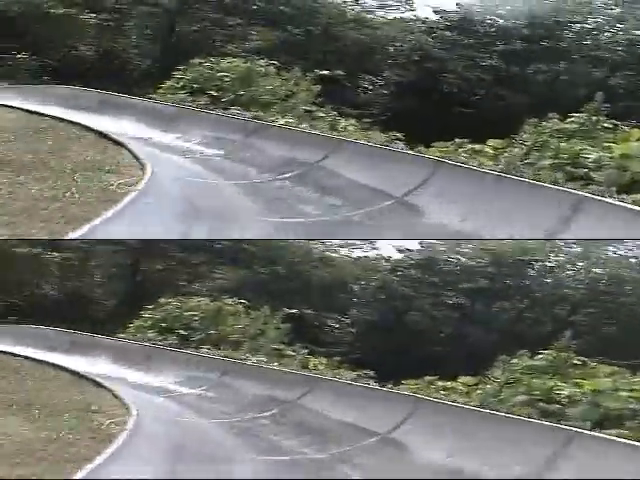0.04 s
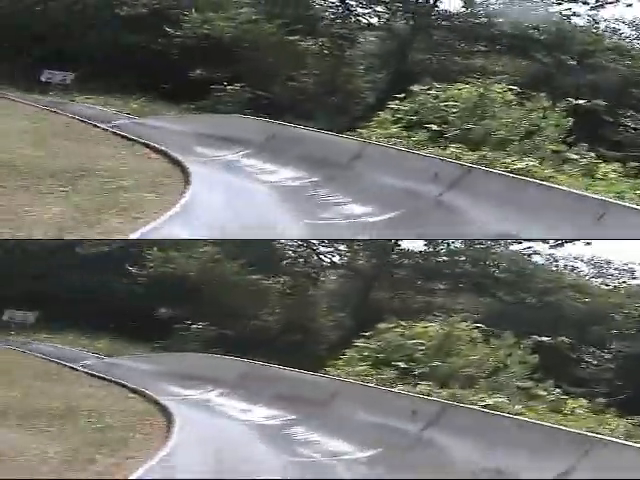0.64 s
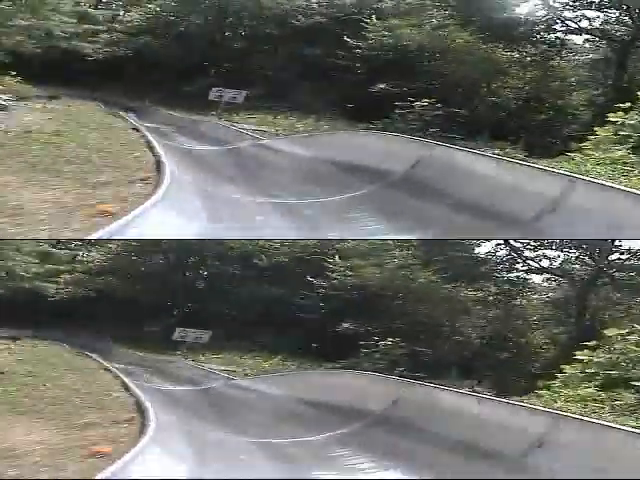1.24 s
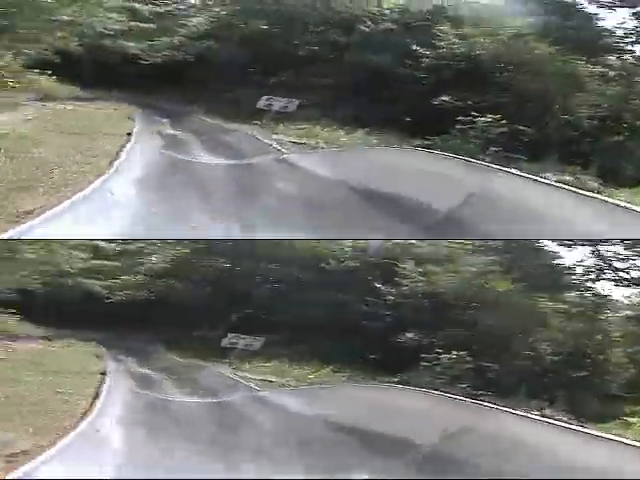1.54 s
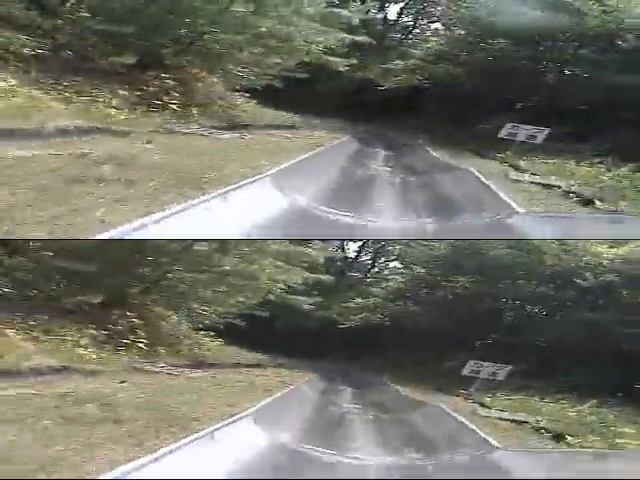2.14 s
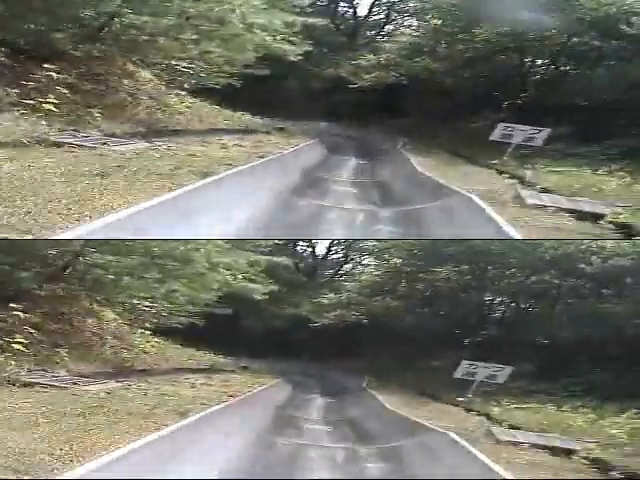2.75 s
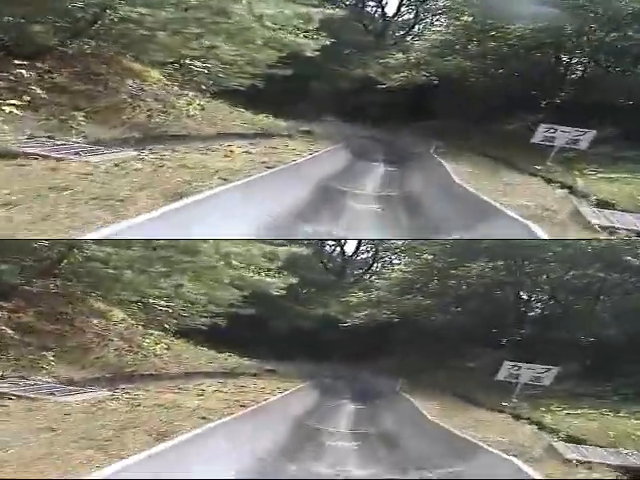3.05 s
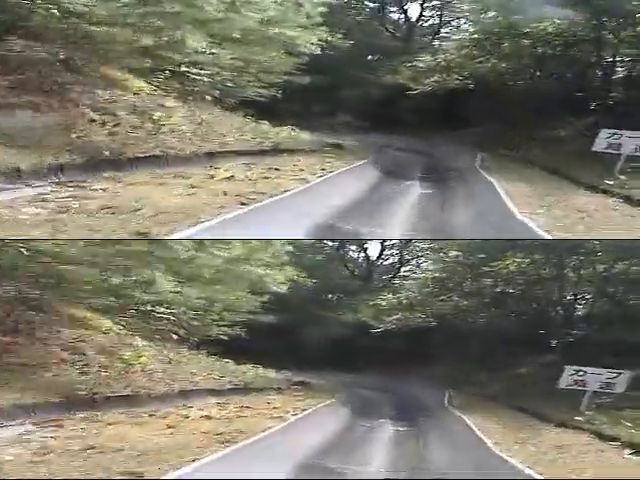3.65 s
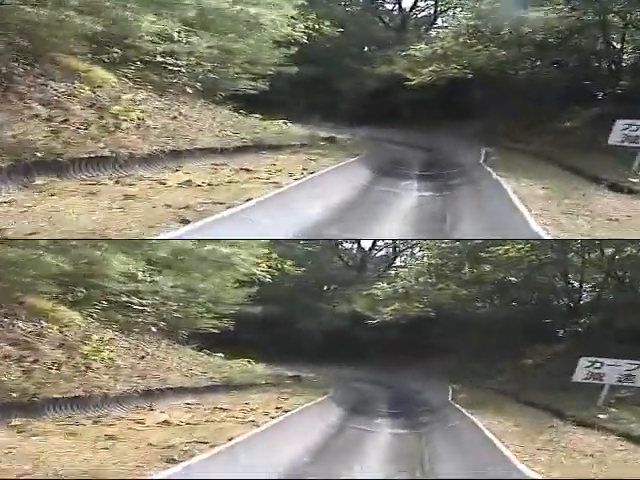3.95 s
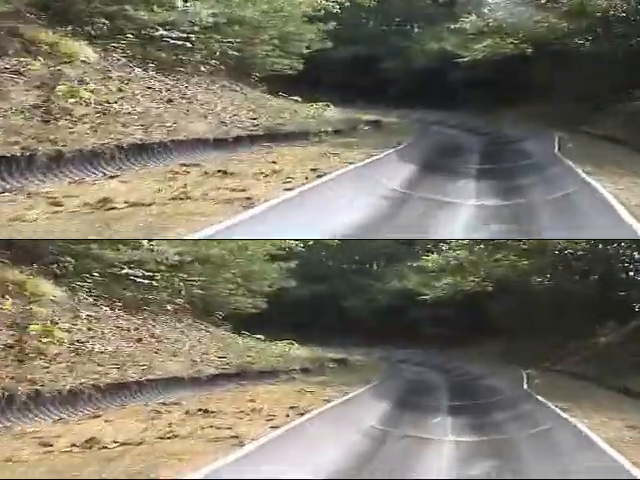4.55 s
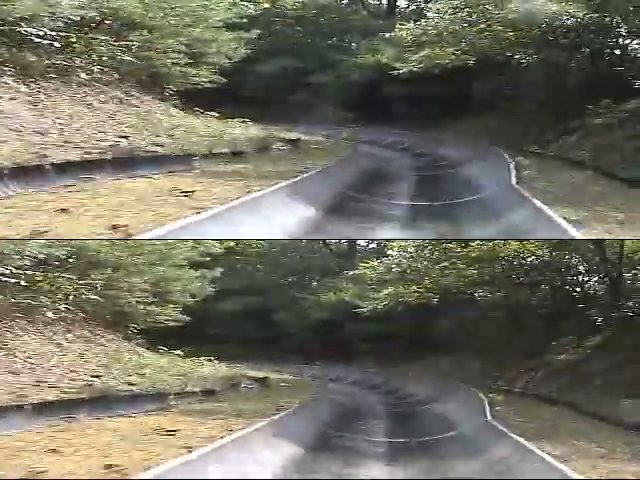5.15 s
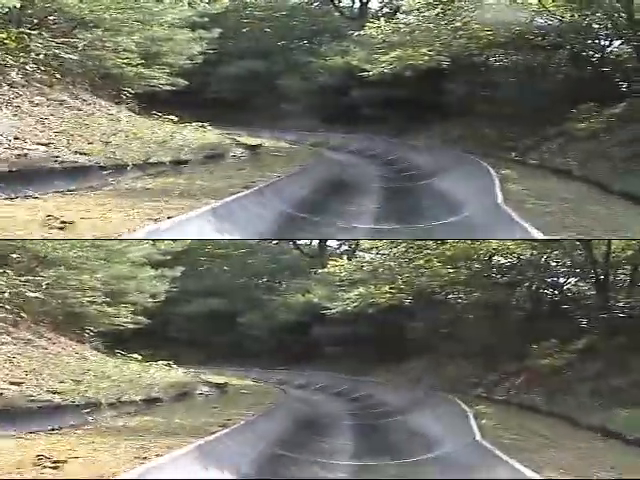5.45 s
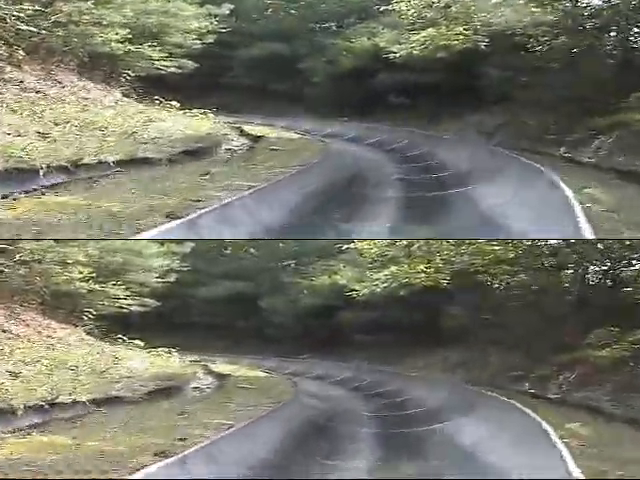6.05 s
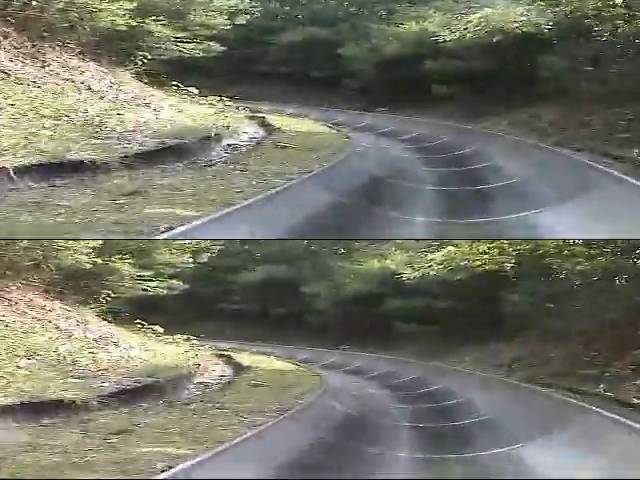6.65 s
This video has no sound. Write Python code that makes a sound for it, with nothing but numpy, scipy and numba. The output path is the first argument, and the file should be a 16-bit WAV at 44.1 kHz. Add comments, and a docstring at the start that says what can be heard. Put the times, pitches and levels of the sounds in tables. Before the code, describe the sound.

A wheeled sled runs down a concrete track, heard from on board. Its wheels rumble and knock over slab joints while the hollow shell booms and loose metal parts clatter. The rolling is gritty at first, then smoother, and the knocks gradually spread out. Cicadas hiss and throb in the surrounding trees, growing louder later on, as gusts of wind buffet the microphone.

```python
"""A wheeled bobsleigh runs down a concrete track towards a wood, heard from a camera on board.
Its wheels rumble and knock over slab joints, the hollow shell booms and loose metal parts clatter.
Behind it, cicadas hiss and throb in the trees with their clicking tymbals, faint whirs glide upward
and wind buffets the microphone. The camera's gain ducks after loud blows."""
import sys
import numpy as np
from scipy import signal
from scipy.fft import rfft, irfft, next_fast_len
from scipy.io import wavfile
from scipy.ndimage import uniform_filter1d
from numba import njit

SR = 44100
rng = np.random.default_rng(int(sys.argv[2]) if len(sys.argv) > 2 else 0)


def master(y):
    """Save y as 16-bit WAV."""
    cut = np.clip(np.atleast_2d(y).T, -1, 1)
    pcm = np.round(cut * 32767)  # scale
    wavfile.write(sys.argv[1], SR, pcm.astype(np.int16))


N = 304731
TIME = np.arange(N) / SR

# wind at the microphone and its gusts
WIND_EQ = [(15, -42), (40, -9), (90, 2), (170, -2.5), (300, -2.5), (600, -19.5), (1500, -32), (5000, -48.5)]  # f/Hz, level/dB
WIND_FADER = [(0, -42), (.25, -58), (.47, -45), (.75, -62), (.98, -48.5), (1.1, -66), (1.55, -59),
              (1.85, -52), (2.3, -53), (2.57, -45), (3.2, -53.5), (3.85, -41.5), (4.25, -51.5), (5, -37.5),
              (5.6, -45.5), (6.1, -46), (6.4, -49), (6.9, -46)]  # t/s, relative level/dB
# the cicada chorus as the trees pass, and the nearest cicada
CHORUS_EQ = [(100, -45), (2000, -15), (3800, -13.5), (5000, 1), (6000, 0.5), (7000, -1), (8400, 1),
             (9200, -5), (10000, -22.5)]  # f/Hz, level/dB
CHORUS_FADER = [(0, -42), (1.5, -45.5), (2.3, -41.5), (2.9, -33.5), (3.02, -40.5), (3.45, -42),
                (3.9, -37.5), (4.45, -41.5), (5.1, -35), (5.75, -34), (6.35, -37.5), (6.9, -35)]  # t/s, relative level/dB
NEAR_CICADA_FADER = [(0, -48), (2, -48), (2.8, -44), (3.4, -46), (3.9, -35), (4.5, -41.5), (4.9, -32),
                     (5.77, -29), (5.85, -34), (6.4, -43), (6.9, -37)]  # t/s, level at the crest of the throb/dB
# faint rising whirs: t/s, level/dB
WHIR_CUES = [(2.718, -47), (3.725, -56), (4.679, -49.5), (5.65, -48), (6.274, -48), (6.555, -54)]
# resonances of the hollow shell and the loose metal parts: f/Hz, width/Hz, lift/dB
SHELL_MODES = [(168, 22, 0), (320, 110, 1), (375.5, 100, 3), (442, 39, 0), (547, 185, 5), (682, 83, 2.5),
               (789, 24, 3), (962, 14, 2), (1236, 60, -1.5), (1477, 24, 2.5), (1900, 48, 3.5)]
METAL_MODES = [(1620, 90, 4), (2100, 110, 4), (2560, 110, 3), (2975, 70, 5), (3444, 140, 5), (4150, 200, 4),
               (4700, 200, 2)]
# tone of the sled's ticks, rumble, grit, clatter and knocks: f/Hz, level/dB
TICK_EQ = [(300, -27), (1500, -9), (2700, -5.5), (3800, 8.5), (5000, -4), (9000, -14.5)]
RUMBLE_EQ = [(30, -30.5), (120, -5.5), (270, 7), (560, 1), (800, -1), (1100, -16.5), (2500, -12),
             (5000, -50.5)]
GRIT_EQ = [(40, -42), (300, -1.5), (800, 15), (1500, 13.5), (2200, 0.5), (3100, -1.5), (4500, -1.5),
           (9000, -20.5)]
CLATTER_EQ = [(20, -46.5), (60, -19), (120, -13.5), (270, 2), (500, -1), (800, -6), (1500, -9),
              (2600, -18.5), (4200, -23), (8000, -25.5), (10000, -36)]
KNOCK_EQ = [(20, -35.5), (60, -26), (120, -14.5), (250, -5), (380, 1), (600, -1), (1000, -1.5), (1700, -8),
            (2500, -19.5), (4000, -23.5), (8000, -33), (10000, -51)]
# the chassis jolts, mostly as the rear wheels reach a joint:
# t/s, strength/dB, bass/dB, treble/dB, clatter t60/s, time in the air/s, rebound/dB
JOLT_CUES = [(0.105, -11, -23, -27.5, 0.23, 0.04, -12), (0.258, -9.5, -22.5, -21.5, 0.36, 0.059, 1),
             (0.404, -9.5, -18, -28, 0.5, 0.035, -4), (0.545, -13.5, -18.5, -19.5, 0.24, 0.044, 5),
             (0.786, -29, -37.5, -3.5, 0.18, .03, -19), (0.865, -15, -17, -43, 0.34, 0.056, -8.5),
             (1.189, -17, -11.5, -16, 0.15, 0.036, -3), (1.573, -26.5, -22, -1.5, .26, .03, -20),
             (1.62, -13, -14.5, -37, 0.29, 0.043, -23), (1.865, -18.5, -12, -19, 0.23, .055, -2),
             (1.977, -12, -12.5, -33, 0.23, 0.037, -16), (2.221, -14.5, -16.5, -14.5, 0.49, 0.018, -8.5),
             (2.288, -16, -13, -20, .2, .021, -17), (2.482, -19, -30.5, -11.5, 0.03, 0.029, -15),
             (2.998, -14, -22.5, -34, 0.13, 0.04, 12), (3.184, -6, -15.5, -15.5, .32, .066, -0.5),
             (3.945, -11.5, -3, -28, 0.22, 0.036, -9), (4.097, -12.5, -22, -11, .26, 0.032, -16.5),
             (4.226, -5, -11.5, -19, 0.45, .045, 1.5), (5.102, -10, -11, -21, 0.6, 0.071, -5),
             (5.258, -12.5, -5.5, -17, 0.11, 0.04, -20), (5.77, -6.5, -16.5, -38, 0.23, .05, -4.5),
             (5.92, -15.5, -24.5, -10, .35, 0.059, -12), (6.100, -3, -9, -15, 0.38, 0.038, -3.5)]
# a jolt's strike, rebound and settling bump: sharpness/gain, 60 dB build-up of the chatter/s
CONTACT_SHAPES = [(0.38, 0.066), (0.68, 0.15), (0.17, 0.017)]
# the front wheels hit a slab joint: t/s, strength/dB, bass/dB, shudder t60/s, hollow ring f/Hz
JOINT_CUES = [(0.719, -16, -27, 0.33, 1007), (1.029, -16.5, -28.5, 0.39, 884),
              (1.362, -13.5, -32, 0.33, 1016), (1.708, -19, -19.5, .36, 1070),
              (2.071, -17, -17.5, 0.32, 1050), (2.944, -13, -12.5, .47, 915),
              (3.966, -10.5, -13.5, 0.44, 2020), (4.848, -21, -12.5, 0.56, 1680),
              (5.786, -10, -13.5, 0.6, 790), (6.714, -13.5, -11, .41, 1100)]
# stereo image of the microphone
SIDE_EQ = [(60, -9.5), (300, -17.5), (700, -11.5), (1300, -8.5), (2400, -2.5), (3100, -2), (3600, -35.5),
           (10000, -25)]  # f/Hz, side gain/dB
BALANCE_EQ = [(60, 1.5), (110, -9.5), (190, -2.5), (330, -3), (570, -2.0), (1000, -1.5), (1770, -0.5),
              (3100, 2), (5450, -2.5), (9580, -2.5)]  # f/Hz, left minus right/dB


def amp(db):
    """Decibels to gain."""
    return 10 ** (np.asarray(db) / 20)


def unit(x):
    """Scale a mid-side pair so that its mid has rms 1."""
    return x / np.std(x[0])


def fade(t, t60):
    """Envelope that is 60 dB down at t60 either side of zero."""
    return amp(-60 * np.abs(t) / t60)


def fader(table):
    """Level automation: straight lines between rows of t/s, level/dB."""
    return np.interp(TIME, *np.transpose(table))


def wander(rate_hz, size=N):
    """Smooth random modulation with a spread near 1."""
    hold = int(SR / rate_hz)
    steps = np.repeat(rng.standard_normal(size // hold + 1), hold)
    return np.sqrt(2) * uniform_filter1d(uniform_filter1d(steps, hold), hold)[:size]


def grains(size, per_s, spread_db):
    """Mid and side streams of tiny contacts of uneven strength."""
    strength = amp(spread_db * np.minimum(rng.exponential(size=size), np.pi))
    contacts = rng.random(size) < per_s / SR
    return unit(strength * contacts * rng.standard_normal((2, size)))


def add(out, x, at_s):
    """Mix x into out, starting at at_s."""
    start = int(at_s * SR)
    lo, hi = max(start, 0), min(start + x.shape[-1], N)
    out[:, lo:hi] += x[:, lo - start:hi - start]


def eq(x, points, modes=()):
    """Minimum-phase EQ: a smooth curve with ringing resonances on top."""
    size = 2 * next_fast_len(x.shape[-1] // 2 + 2048)
    hz = np.maximum(np.arange(size // 2 + 1) * SR / size, 1)
    at_hz, at_db = np.transpose(points)
    db = np.interp(np.log(hz), np.log(at_hz), at_db)
    for centre, width, lift in modes:
        db = db + lift / (1 + (2 * (hz - centre) / width) ** 2)
    cepstrum = irfft(np.log(amp(db)))
    cepstrum[1:size // 2] *= 2  # folded so that the ring follows the hit
    cepstrum[size // 2 + 1:] = 0
    return irfft(rfft(x, size) * np.exp(rfft(cepstrum)))[..., :x.shape[-1]]


def shelves(x, bass_db, treble_db, modes=()):
    """A heavy blow has more bass, a hard one more treble."""
    return eq(x, [(200, bass_db), (450, .011), (1400, .016), (3200, treble_db)], modes)


def wind():
    """Eddies at the microphone push its left and right sides mostly against each other."""
    gusts = amp(fader(WIND_FADER) + 2.2 * wander(rate_hz=18))
    mid, side = unit(eq(rng.standard_normal((2, N)), WIND_EQ)) * gusts
    return amp(1.5) * mid + amp(12) * np.array([side, -side])


def tymbals(click_hz, ring_hz, ring_s, second_gain, scatter):
    """Two tymbals click in turn and ring the cicada's abdomen; foliage scatters part of each click."""
    clicks = np.cumsum(click_hz * (1 + .0045 * wander(rate_hz=50))) / SR
    age = clicks % 1 / click_hz
    in_turn = np.where(clicks % 2 < 1, 1, second_gain)
    ring = in_turn * age * np.exp(-age / ring_s) * np.sin(2 * np.pi * ring_hz * age)
    direct = np.array([[1], [0]])  # mid only
    leaves = unit(uniform_filter1d(rng.standard_normal((2, N)), size=30))
    return unit(ring * (direct + scatter * leaves))


def cicadas(throb_hz=16.57, crest_s=5.222):
    """A far chorus merges into hiss; one cicada buzzes high; the nearest throbs."""
    beat = throb_hz * (TIME - crest_s) + .05 * wander(rate_hz=12)
    slack = (1 - np.cos(2 * np.pi * beat)) / 2
    throb = 1 - .76 * slack
    ring_hz = 5520 + 800 * slack ** 2  # rings lower as each throb swells
    near = tymbals(click_hz=410.5, ring_hz=ring_hz, ring_s=.00038, second_gain=-.8, scatter=.72)
    high = tymbals(click_hz=406, ring_hz=8450, ring_s=.00022, second_gain=.9, scatter=1.1)
    chorus = unit(eq(rng.standard_normal((2, N)), CHORUS_EQ)) + .42 * high
    chorus_db = fader(CHORUS_FADER) + 1.5 + .69 * wander(rate_hz=73)
    return chorus * amp(chorus_db) + near * throb * amp(fader(NEAR_CICADA_FADER))


def whirs(length_s=.185, from_hz=1760, to_hz=2730):
    """A thin, airy tone glides upward, mostly just before a joint."""
    out, size = np.zeros((2, N)), int(length_s * SR)
    phase = 2 * np.pi * np.cumsum(np.geomspace(from_hz, to_hz, size)) / SR
    glide = np.sqrt(2) * np.sin(phase) * signal.windows.tukey(size)
    for at_s, db in WHIR_CUES:
        flutter = unit(uniform_filter1d(rng.standard_normal((2, size)), size=170))
        add(out, amp(db) * flutter * glide, at_s)
    return out


def bend(ends_s=2.34, crossfade_s=.29):
    """1 while the sled leans in the banked bend, 0 on the straight."""
    return np.clip(.5 + (ends_s - TIME) / crossfade_s, 0, 1)


def metal_ticks(per_s=16, t60=.079, level_db=-45.5):
    """Loose metal parts tick at random while the sled leans in the bend."""
    hits = (rng.random(N) < per_s / SR) * rng.random(N)
    bursts = signal.lfilter([1], [1, -fade(1 / SR, t60)], hits)
    chatter = eq(grains(N, per_s=4600, spread_db=-4.5) * bursts, TICK_EQ, METAL_MODES)
    return unit(chatter) * amp(level_db) * bend()


def wheel_load(worn_edge_s=.08, shake_t60=.56):
    """Rumble and grit gains: both swell on the rough edge before each joint and after a blow."""
    worn = sum(np.exp((np.minimum(TIME, at_s) - at_s) / worn_edge_s) * (TIME < at_s)
               for at_s, *_ in JOINT_CUES)
    shake = np.zeros((1, N))
    for at_s, db, *_ in JOINT_CUES + JOLT_CUES:
        add(shake, (amp(db) * fade(TIME[None, :SR], shake_t60)) ** 2, at_s)
    rumble_db = -39 - .5 * bend()
    grit_db = -45.5 + 12 * bend()  # the bend scrubs the wheels sideways
    rumble_power = amp(rumble_db) ** 2 + amp(-32) ** 2 * worn + amp(-26.5) ** 2 * shake[0]
    grit_power = amp(grit_db) ** 2 + amp(-38.5) ** 2 * worn + amp(-21) ** 2 * shake[0]
    return np.sqrt([rumble_power, grit_power])


def rolling(patchy_db=1.7):
    """Patches of rough concrete shake the shell through the wheels: low rumble with grit on top."""
    rumble_gain, grit_gain = wheel_load()
    patches = amp(patchy_db * wander(rate_hz=40))
    rumble = unit(eq(grains(N, per_s=1200, spread_db=1), RUMBLE_EQ, SHELL_MODES))
    grit = unit(eq(grains(N, per_s=5500, spread_db=-.5), GRIT_EQ, SHELL_MODES + METAL_MODES))
    return (rumble * rumble_gain + grit * grit_gain) * patches


def jolt_contacts(settle_s=.075):
    """Each jolt strikes, throws the metal together on a brighter rebound and settles with a dull bump."""
    mean_bass_db, mean_treble_db = np.mean(JOLT_CUES, axis=0)[2:4]
    strike, rebound, settle = CONTACT_SHAPES
    for at_s, db, bass_db, treble_db, t60, air_s, rebound_db in JOLT_CUES:
        bass_db, treble_db = bass_db - mean_bass_db, treble_db - mean_treble_db
        yield at_s, db, bass_db, treble_db, t60, strike
        yield at_s + air_s, db + rebound_db, bass_db, treble_db + 1.5, t60, rebound
        yield at_s + air_s + settle_s, db + rebound_db - 12.5, bass_db + 10.5, treble_db, t60, settle


def chassis_clatter():
    """Loose parts begin to chatter, strike home and die away in uneven bounces."""
    out, lead = np.zeros((2, N)), SR // 16
    t = np.arange(-lead, SR // 3) / SR
    transient = np.exp(-((t - .004) / .006) ** 2)
    for at_s, db, bass_db, treble_db, t60, (sharpness, build_up_s) in jolt_contacts():
        chatter = np.where(t < 0, fade(t, build_up_s), fade(t, t60))
        bounces = amp(2.2 * wander(rate_hz=160, size=len(t)))
        envelope = sharpness * transient + .8 * chatter * bounces
        blow = grains(len(t), per_s=5000, spread_db=2) * envelope
        add(out, amp(db) * shelves(blow, bass_db, treble_db), at_s - lead / SR)
    return amp(3) * eq(out, CLATTER_EQ, SHELL_MODES + METAL_MODES)


def joint_knocks(attack_s=.0025, squeeze_s=.014, shudder_db=6.5):
    """The wheels drop into a slab joint and climb out within milliseconds; the shell shudders on."""
    out, t = np.zeros((2, N)), np.arange(SR // 2) / SR
    mean_db, mean_bass_db = np.mean(JOINT_CUES, axis=0)[1:3]
    attack = np.minimum(t / attack_s, 1)
    squeeze = np.exp(-(t / squeeze_s) ** 2)
    for at_s, db, bass_db, t60, ring_hz in JOINT_CUES:
        envelope = attack * (squeeze + amp(shudder_db) * fade(t, t60))
        blow = grains(len(t), per_s=6600, spread_db=-1.5) * envelope
        blow[0, 0] -= 2.5  # a centred click on the front of the knock
        hollow_ring = [(ring_hz, .14 * ring_hz, 7)]  # f/Hz, width/Hz, lift/dB
        treble_db = db - mean_db - .5  # harder knocks are brighter
        add(out, amp(db) * shelves(blow, bass_db - mean_bass_db, treble_db, hollow_ring), at_s)
    return amp(7) * eq(out, KNOCK_EQ, SHELL_MODES)


def scene():
    """Sled and wood, mixed in mid-side and decoded to left and right, with the wind laid over them."""
    mid, side = joint_knocks() + chassis_clatter() + metal_ticks() + rolling() + cicadas() + whirs()
    side = eq(side, SIDE_EQ)
    left = eq(mid + side, [(hz, db / 2) for hz, db in BALANCE_EQ])
    right = eq(mid - side, [(hz, -db / 2) for hz, db in BALANCE_EQ])
    return np.array([left, right]) + wind()


@njit
def follow(x, attack_s, release_s):
    """Peak follower that rises fast and sinks slowly."""
    out, level = np.empty(len(x)), 0.
    for i in range(len(x)):
        level += (x[i] - level) / (SR * (attack_s if x[i] > level else release_s))
        out[i] = level
    return out


def record(dry):
    """The camera's gain ducks after loud blows, the peaks are soft-clipped and the top is cut."""
    threshold_db, cutoff_hz = -6.5, 9950
    peaks = follow(np.abs(dry).max(axis=0), attack_s=.0006, release_s=.22)
    ducked = dry / np.maximum(peaks / amp(threshold_db), 1) ** .59
    lowpass = signal.ellip(10, .2, 70, cutoff_hz, fs=SR, output="sos")
    return signal.sosfilt(lowpass, np.tanh(ducked))


dry = scene()
out = record(dry)
master(out)
```